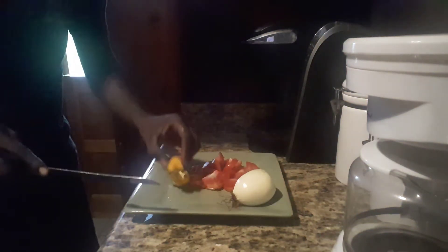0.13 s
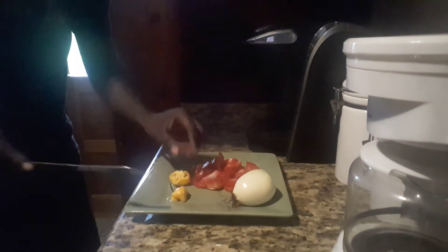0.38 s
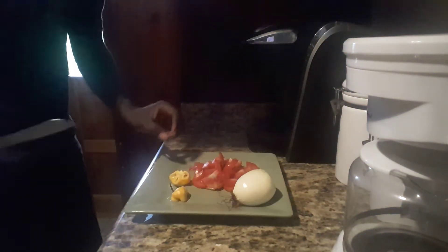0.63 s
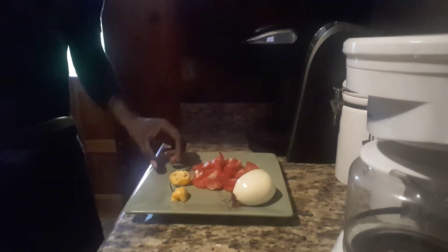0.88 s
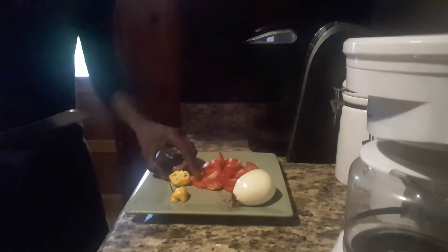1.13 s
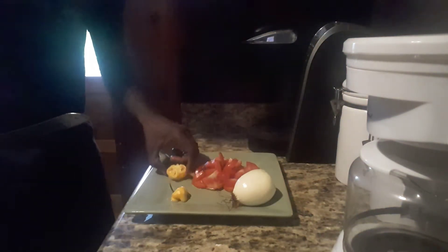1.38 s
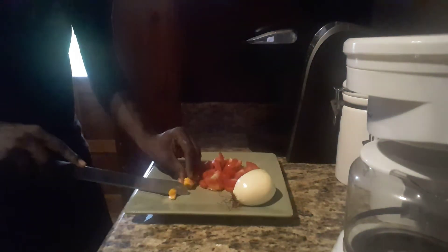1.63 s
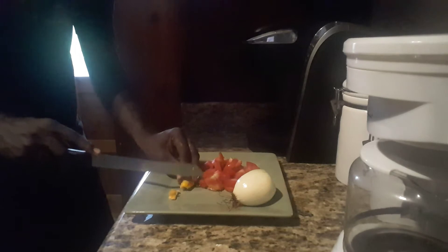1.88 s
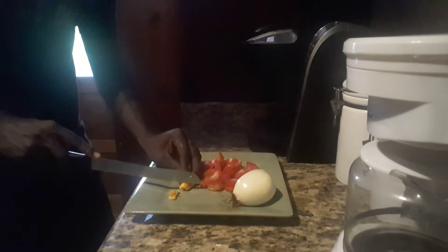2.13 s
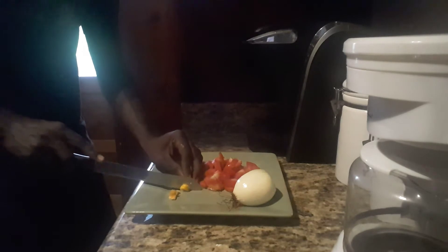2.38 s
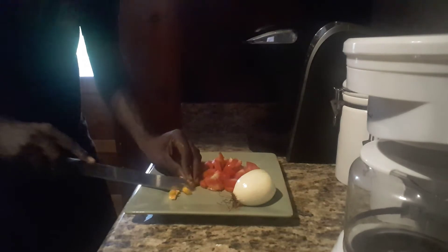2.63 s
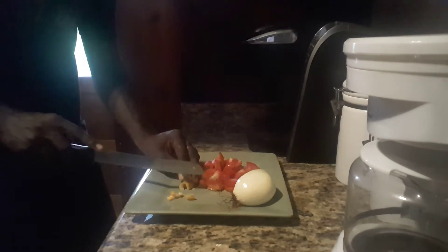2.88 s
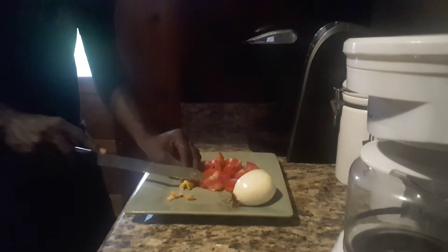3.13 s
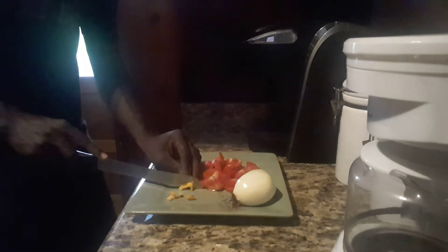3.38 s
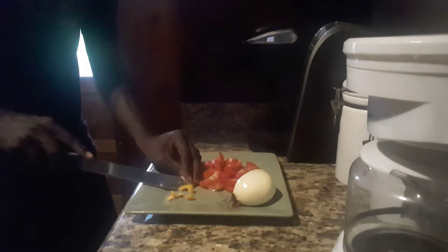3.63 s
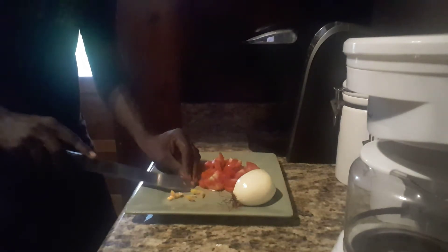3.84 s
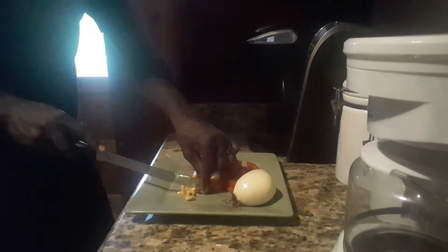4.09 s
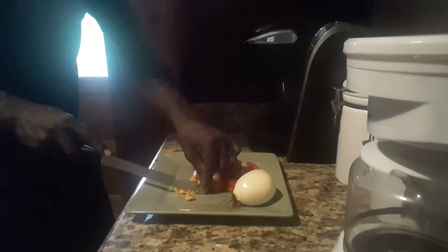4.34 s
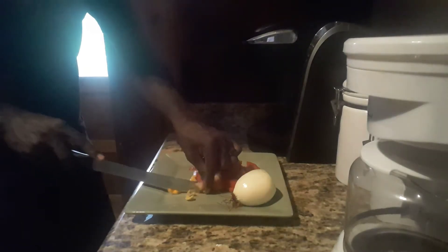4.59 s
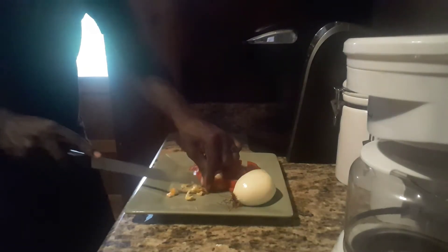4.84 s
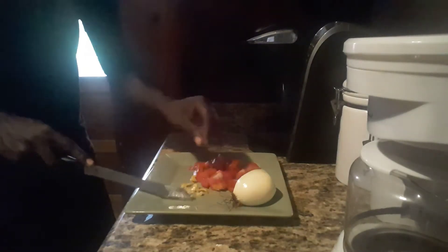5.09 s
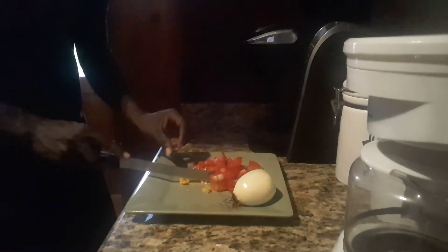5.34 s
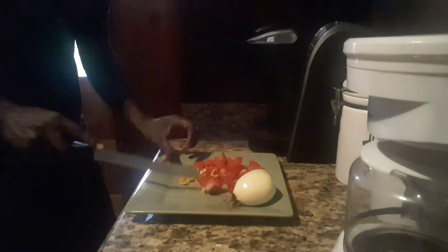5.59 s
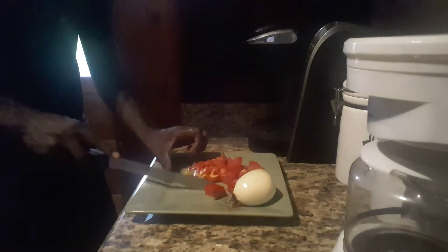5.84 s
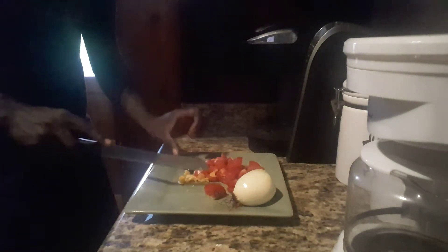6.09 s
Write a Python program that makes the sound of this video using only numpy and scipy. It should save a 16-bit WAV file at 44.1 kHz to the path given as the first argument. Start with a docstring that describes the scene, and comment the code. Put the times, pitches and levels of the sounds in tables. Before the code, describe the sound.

In a quiet kitchen, a knife cuts small vegetables on a stoneware plate on a stone counter. After over two seconds of near silence, a hard ceramic clack rings briefly, followed by scratchy slides. More clacks come about a second apart, with faint skin crackle, gritty scraping and soft thumps near the end. A close small microphone catches a short room tail, low hum and slight hiss.

```python
"""A knife cuts small vegetables on a stoneware plate that lies on a stone counter in a quiet kitchen.
The blade knocks and slides on the glaze: decaying sines and noise ring the plate, rough noise drives it.
Vegetable skin crackles (bright noise); hands and handle thump the counter (soft pushes on low modes).
The hard kitchen walls add a short tail of decaying noise.
Behind it lie a low room hum, wavering low noise near 100 Hz and microphone hiss, all filtered noise."""
import sys
import numpy as np
from scipy import signal
from scipy.fft import rfft, irfft
from scipy.io import wavfile
from scipy.ndimage import uniform_filter1d

SR = 44100
rng = np.random.default_rng(int(sys.argv[2]) if len(sys.argv) > 2 else 0)


def volts_from_decibels(level):
    """Turn decibel levels (scalar or array-like) into linear amplitude factors."""
    exponent = np.asarray(level, float) / 20
    return 10 ** exponent


def digitize_waveform(pressure):
    """Quantize a signal to 16-bit integers and store it at the path in sys.argv[1].

    Rows of a 2-D input are taken as channels; values are limited to [-1, 1].
    """
    field = np.atleast_2d(pressure).T
    bounded = np.clip(field, -1, 1)
    quanta = np.round(bounded * 32767).astype(np.int16)
    wavfile.write(sys.argv[1], SR, quanta)


N = 274302  # length of the scene in samples
RING = int(.3 * SR)  # length of one plate or counter response in samples

# Blade blows; where they land sets the level of each group of plate modes:
# (time [s], low group [dB], middle group [dB], high group [dB], counter before its band-pass [dB])
BLADE_BLOWS = [(0.417, -59, -52.5, -71.5, -61), (1.559, -56.5, -51.5, -52.5, -71),
               (2.248, -82, -83, -74, -73), (2.396, -23, -21.5, -21.5, -41),
               (3.516, -24.5, -25.5, -24, -42.5), (4.471, -26, -24, -27, -40.5),
               (5.238, -32.5, -22, -25.5, -39.5), (5.929, -27.5, -23.5, -27, -43.5)]
BLOW_TOP_DB = -13  # top group relative to the high one


def blows():
    """The edge lands, chatters for some milliseconds, rings the plate and thumps the counter."""
    out = np.zeros(N + 3 * RING)
    for time, low_db, middle_db, high_db, counter_db in BLADE_BLOWS:
        group_gains = volts_from_decibels([low_db, middle_db, high_db, high_db + BLOW_TOP_DB])
        # quick chatter of the edge, then the plate buzzes on the stone as it settles
        chatter = 0.032 * fade(0.066, 2 * RING)
        buzz = 0.017 * fade(0.45, 2 * RING)
        contact = rng.standard_normal(2 * RING) * (chatter + buzz)
        contact[0] = 1  # the first hit
        plate_ring = group_gains @ plate(scatter_db=4.0)
        add(out, time, signal.fftconvolve(plate_ring, unit(contact)))
        add(out, time, volts_from_decibels(counter_db) * band(counter(push_ms=0.26), 180, 2000))
    return out[:N]


# Modes of the stoneware plate: (frequency [Hz], relative level [dB], time to fall by 60 dB [s])
PLATE_MODES = [(735, -8, .06), (793, -6, .07), (858, 0, .1), (945, -4, .08), (1040, -7, .07), (1297, 0, .1),
               (1370, -5, .07), (1437, -6, .07), (1487, -3, .09), (1545, -6, .07), (1830, -11, .08),
               (2015, -8, .06), (2145, -11, .07), (2460, -6, .06), (2590, -8, .05), (2732, -6, .06),
               (3045, -4, .07), (3205, -8, .05), (3378, -1, .07), (3510, -7, .06), (3735, -6, .06),
               (3940, -3, .08), (4134, -8, .05), (4480, -9, .04), (4850, -12, .04), (6010, -3, .02),
               (6350, -4, .02), (7070, 0, .025), (7450, -4, .02), (8500, -4, .02), (9400, -6, .02)]
# Borders between the low, middle, high and top group of plate modes: frequency [Hz]
GROUP_BORDERS_HZ = [640, 1150, 2300, 5500, 15500]
# The many weak, short modes of each group, heard as a crack:
# (level relative to the ring [dB], time to fall by 60 dB [s])
GROUP_CRACKS = [(-3.5, 0.0078), (-12, 0.12), (-2, 0.065), (-1, 0.13)]


def plate(scatter_db):
    """Response of the four mode groups to one tap: ringing modes plus a crack of decaying noise."""
    groups = []
    for low_hz, high_hz, (crack_db, t60) in zip(GROUP_BORDERS_HZ, GROUP_BORDERS_HZ[1:], GROUP_CRACKS):
        crack = band(rng.standard_normal(RING) * fade(t60, RING), low_hz, high_hz)
        group_modes = [mode for mode in PLATE_MODES if low_hz <= mode[0] < high_hz]
        tone = ring(group_modes, scatter_db, split=0.0055)
        both = tone + volts_from_decibels(crack_db) * unit(crack)
        groups.append(unit(band(both, 0.75 * low_hz, 0.93 * high_hz)))
    return np.array(groups)


# Modes of the stone counter: (frequency [Hz], relative level [dB], time to fall by 60 dB [s])
COUNTER_MODES = [(104, -6, .1), (152, 9.5, 0.081), (270, -5.5, 0.12), (356, -8.5, 0.16), (490, -13, 0.077),
                 (608, -3.5, .07), (730, -11.5, 0.059)]
REBOUND_S, REBOUND_DB = .028, -1.5  # the counter is pushed twice as the plate rocks back


def counter(push_ms):
    """The counter modes rounded off by a soft push, then heard again for its rebound."""
    push = np.hanning(int(push_ms * SR / 1000) + 3)
    once = np.convolve(ring(COUNTER_MODES, scatter_db=-2.9, split=0.021), push)[:RING]
    again = np.pad(once, (int(REBOUND_S * SR), 0))[:RING]
    return unit(once + volts_from_decibels(REBOUND_DB) * again)


PARTNER = .3  # strength of the weaker mode of a pair


def ring(modes, scatter_db, split):
    """Damped modes in close pairs that beat; each call draws other strengths and another split."""
    t = np.arange(RING) / SR
    total = np.zeros(RING)
    for k, (hz, db, t60) in enumerate(modes):
        strength_chance, split_chance = rng.standard_normal(2)
        strong = np.sin(2 * np.pi * hz * t)
        weak = PARTNER * np.sin(2 * np.pi * hz * (1 + split * split_chance) * t)
        sign = (-1) ** k  # neighbouring modes start in opposite directions
        total += sign * volts_from_decibels(db + scatter_db * strength_chance) * fade(t60, RING) * (strong + weak)
    return unit(total)


# Strokes of the edge on the glaze; rise and fall are the times for 20 dB:
# (firmest time [s], rise [s], fall [s], level [dB], brightness [dB])
EDGE_SLIDES = [(0.414, 0.024, 0.012, -62, 1), (1.614, 0.071, 0.071, -49, 2.5), (1.66, 0.16, .12, -53, -3.5),
               (1.828, 0.11, 0.043, -56, -2.5), (2.321, 0.007, 0.55, -61.5, 3.5),
               (2.392, 0.04, 0.0044, -41, 1.5), (2.5, 0.022, 0.043, -43.5, 3), (2.644, 0.41, 0.059, -53, 3),
               (2.779, 0.079, 0.077, -53.5, -3.5), (2.85, 0.096, 0.055, -49, -1),
               (3.493, 0.017, 0.14, -38.5, 0.5), (3.601, 0.012, 0.078, -45.5, 4.5),
               (3.73, 0.34, 0.021, -51, 2.5), (3.795, 0.05, 0.096, -51, -5), (3.86, 0.16, 0.081, -45.5, -1),
               (5.292, .02, 0.14, -50, -3), (5.44, 0.48, 0.035, -49.5, 3.5)]
SLIDE_LOW_DB = -5  # low group relative to the middle one
SLIDE_HIGH_DB, SLIDE_TOP_DB = -4, -17  # groups relative to the stroke level, before brightness
TOP_PER_BRIGHT = 2.7  # the top gains this many dB per dB of brightness
SLIDE_AIR_DB = -7  # bare hiss of the edge relative to the top group


def slides():
    """The sliding edge keeps the plate modes ringing, damped by its pressure, and hisses in the treble."""
    low, middle, high, top = plate(scatter_db=-2.5) * fade(0.078, RING)
    air = unit(band(signal.unit_impulse(RING), 9000, 16000))
    catches = grit(rough_db=2.5, hold_s=.003)
    bodies = [volts_from_decibels(SLIDE_LOW_DB) * low + middle, high, top + volts_from_decibels(SLIDE_AIR_DB) * air]
    level_db, bright_db = np.transpose(EDGE_SLIDES)[3:]
    high_db = level_db + SLIDE_HIGH_DB + bright_db
    top_db = level_db + SLIDE_TOP_DB + TOP_PER_BRIGHT * bright_db
    out = np.zeros(N)
    for body, stroke_db in zip(bodies, [level_db, high_db, top_db]):
        drive = catches * pressure(EDGE_SLIDES, stroke_db)
        out += signal.fftconvolve(drive, unit(body))[:N]
    return out


def grit(rough_db, hold_s):
    """Dense catches of steel as noise whose size wanders every few milliseconds; rms 1."""
    hold = int(hold_s * SR)
    steps = np.repeat(rng.standard_normal(N // hold + 1), hold)
    size = volts_from_decibels(rough_db * uniform_filter1d(steps, hold)[:N])
    return steady(size * rng.standard_normal(N))


TOUCH_DB = -12.5  # the edge touches down this far under its firmest level
LONGEST_SWELL_S = .18  # but no earlier than this before the firmest moment


def pressure(strokes, levels_db):
    """Gain of strokes that touch down, swell to their firmest moment and ease off, straight in dB."""
    t = np.arange(N) / SR
    power = np.zeros(N)
    for (firmest, rise, fall, *_), db in zip(strokes, levels_db):
        swell_s = min(-rise * TOUCH_DB / 20, LONGEST_SWELL_S)
        touch = np.clip((t - firmest + swell_s) / 0.0035, 0, 1)
        drop_db = 20 * np.maximum((firmest - t) / rise, (t - firmest) / fall)
        power += (touch * volts_from_decibels(db - drop_db)) ** 2
    return np.sqrt(power)


# Blade edge splitting the skin; rise and fall are the times for 20 dB:
# (firmest time [s], rise [s], fall [s], level of the bright crackle [dB])
SKIN_CUTS = [(3.409, .012, 0.077, -56.5), (3.485, 0.072, 0.0045, -65), (4.076, .025, 0.077, -70),
             (4.134, .15, 0.018, -76.5)]
SKIN_AIR_DB = -17.5  # airy top relative to the bright crackle


def skin():
    """Fine bright crackle as the edge bites: uneven noise in two treble bands."""
    crackle = grit(rough_db=3., hold_s=.003)
    bright = steady(band(crackle, 3500, 5400))
    airy = steady(band(crackle, 5500, 12000))
    return (bright + volts_from_decibels(SKIN_AIR_DB) * airy) * pressure(SKIN_CUTS, np.transpose(SKIN_CUTS)[3])


# Soft thumps of hand or handle: (time [s], plate level [dB], counter level [dB], push length [ms])
SOFT_THUMPS = [(0.409, -66, -51, 2.0), (0.46, -55.5, -51.5, 0.71), (1.262, -71, -60.5, 1.16),
               (1.3, -89, -65, 3.0), (5.016, -43.5, -47, 0.48), (5.389, -40.5, -46.5, 0.61),
               (6.009, -43, -48, 0.55)]


def thumps():
    """A soft push reaches only the counter and lower plate modes, which the hand damps to a dull knock."""
    out = np.zeros(N + 2 * RING)
    for time, plate_db, counter_db, push_ms in SOFT_THUMPS:
        low, middle = plate(scatter_db=8.5)[:2] * fade(0.053, RING)
        dull = band(rng.standard_normal(RING) * fade(0.21, RING), 440, 1430)
        width = push_ms * SR / 1000
        push = np.exp(-.5 * ((np.arange(200) - width) / (width / 4)) ** 2)
        knock = np.convolve(low + middle + 0.47 * unit(dull), push)
        add(out, time, volts_from_decibels(plate_db) * unit(knock))
        add(out, time, volts_from_decibels(counter_db) * counter(push_ms))
    return out[:N]


# Path over the counter to the microphone, with dips where the reflection cancels:
# (frequency [Hz], gain [dB])
COUNTER_PATH = [(40, -14.5), (100, 1.5), (1050, -1.5), (1190, -7), (1300, -2), (2150, 0.5), (2320, -7.5),
                (2500, -2.5), (5150, -2.5), (5420, -17), (5700, -0.5), (9000, -4), (15000, -9.5)]


def path(x):
    """Colours the sound on its way over the counter: direct and reflected sound partly cancel."""
    return signal.fftconvolve(x, causal(COUNTER_PATH, count=2048))[:N]


# Time the room tail takes to fall by 60 dB: (frequency [Hz], time [s])
ROOM_FADE = [(150, 0.36), (700, 0.55), (2000, 0.4), (5000, 0.57), (12000, 0.42)]


def room(x):
    """Dense tail of a small hard room: octave bands of noise, each fading at its own rate."""
    hz, t60 = np.transpose(ROOM_FADE)
    tail = np.zeros(2 * RING)
    for centre in 125 * 2. ** np.arange(8):
        length = np.interp(np.log(centre), np.log(hz), t60)
        low_hz, high_hz = centre / np.sqrt(2), min(centre * np.sqrt(2), .45 * SR)
        tail += band(rng.standard_normal(2 * RING), low_hz, high_hz) * fade(length, 2 * RING)
    rise = np.clip(np.arange(2 * RING) / SR / 0.004, 0, 1)  # the first walls answer after a few ms
    return signal.fftconvolve(x, unit(tail * rise))[:N]


# Colour of the room hum: (frequency [Hz], relative level per Hz [dB])
HUM_COLOUR = [(15, -39.5), (25, -13.5), (43, -17), (80, -11), (110, -6), (185, -8.5), (234, -10.5),
              (412, -12), (800, -19.5), (1500, -24), (2800, -28), (4000, -31.5), (5500, -39.5),
              (8000, -61.5)]
HUM_DB = -69.5  # rms level


def hum():
    """Half-octave bands of low room noise that swell together and flicker alone."""
    def walk(rate_hz):
        """Random wandering with about rate_hz new values a second, joined by straight lines."""
        count = int(rate_hz * N / SR) + 2
        return np.interp(np.arange(N), np.linspace(0, N, count), rng.standard_normal(count))

    hz = np.fft.rfftfreq(N, 1 / SR) + 1
    noise = rfft(rng.standard_normal(N)) * colour(HUM_COLOUR, N)
    swell = walk(1.5)
    out = np.zeros(N)
    for octave in np.arange(4, 14.5, .5):  # band centres as powers of two, in Hz
        window = np.clip(1 - 2 * np.abs(np.log2(hz) - octave), 0, 1)
        out += irfft(noise * window, N) * volts_from_decibels(0.37 * swell + 0.46 * walk(2.2))
    return steady(out) * volts_from_decibels(HUM_DB)


# Level of the low room noise near 100 Hz, wandering by chance: (time [s], level [dB])
LOW_NOISE_LEVEL = [(0.0, -60), (0.19, -78.5), (2.23, -75.5), (2.53, -68), (2.77, -83.5), (3.59, -68.5),
                   (4.17, -75), (4.66, -75), (4.83, -75.5), (5.33, -72), (5.63, -82), (6.22, -78.5)]


def low_noise():
    """Narrow room noise near 100 Hz whose level follows the table."""
    time, db = np.transpose(LOW_NOISE_LEVEL)
    noise = steady(band(rng.standard_normal(N), 80, 140))
    return noise * volts_from_decibels(np.interp(np.arange(N) / SR, time, db))


# Colour of the microphone hiss: (frequency [Hz], relative level per Hz [dB])
HISS_COLOUR = [(2650, -31), (4500, -1), (6770, -6), (7210, -4), (11500, -1), (15500, -1)]
HISS_DB = -84.5  # rms level before the microphone's top cut


def hiss():
    """Steady self-noise of the microphone: coloured noise."""
    spectrum = rfft(rng.standard_normal(N)) * colour(HISS_COLOUR, N)
    return steady(irfft(spectrum, N)) * volts_from_decibels(HISS_DB)


def unit(x):
    """Scale to energy 1."""
    return x / np.sqrt(np.sum(x ** 2) + 1e-18)


def steady(x):
    """Scale a sound as long as the scene to rms 1."""
    return unit(x) * np.sqrt(N)


def band(x, lo_hz, hi_hz):
    """Steep band-pass."""
    return signal.sosfilt(signal.butter(3, [lo_hz, hi_hz], "band", fs=SR, output="sos"), x)


def fade(t60, count):
    """Exponential decay by 60 dB in t60 seconds."""
    return np.exp(-np.log(1000) * np.arange(count) / SR / t60)


def add(out, time, stroke):
    """Place a stroke; one of energy 1 gets rms 1 when counted over 29 ms."""
    i = int(time * SR)
    out[i:i + len(stroke)] += stroke * np.sqrt(0.029 * SR)


def colour(points, count):
    """Gain per frequency bin from (frequency [Hz], level [dB]) points."""
    hz, db = np.transpose(points)
    return volts_from_decibels(np.interp(np.log(np.fft.rfftfreq(count, 1 / SR) + 1), np.log(hz), db))


def causal(points, count):
    """Minimum-phase response with the given colour, from the folded cepstrum."""
    cepstrum = irfft(np.log(colour(points, count)), count)
    cepstrum[1:count // 2] *= 2
    cepstrum[count // 2 + 1:] = 0
    return irfft(np.exp(rfft(cepstrum)), count)


ROOM_DB = -9.5  # gain of the room tail


def scene():
    """Blade, skin, plate and counter in the room, over the hum and the low noise."""
    near = path(blows() + slides() + skin() + thumps())
    return (near + volts_from_decibels(ROOM_DB) * room(near) + hum() + low_noise())[None]


def band_limit(x):
    """A steep low-pass at the top of the band."""
    return signal.sosfilt(signal.butter(12, 16500, fs=SR, output="sos"), x)


def record(dry):
    """One small microphone adds its hiss and cuts the top of the treble with a steep low-pass."""
    top_cut = signal.ellip(8, .2, 60, 15600, fs=SR, output="sos")  # ripple .2 dB, stop 60 dB, edge in Hz
    mix = signal.sosfilt(top_cut, dry + hiss())
    return band_limit(mix)


dry = scene()
out = record(dry)
digitize_waveform(out)
```